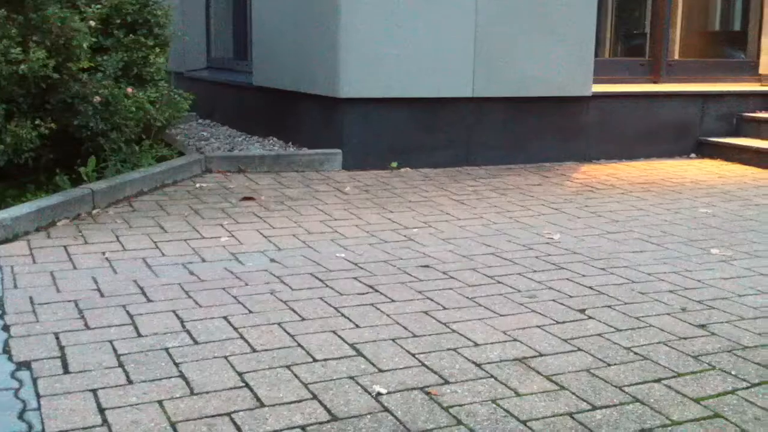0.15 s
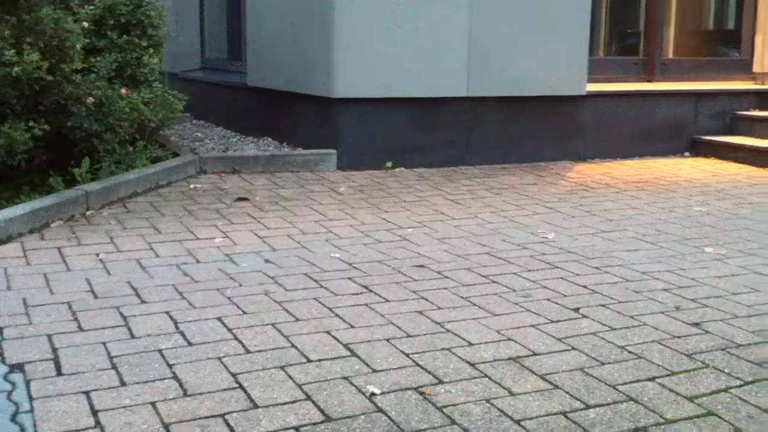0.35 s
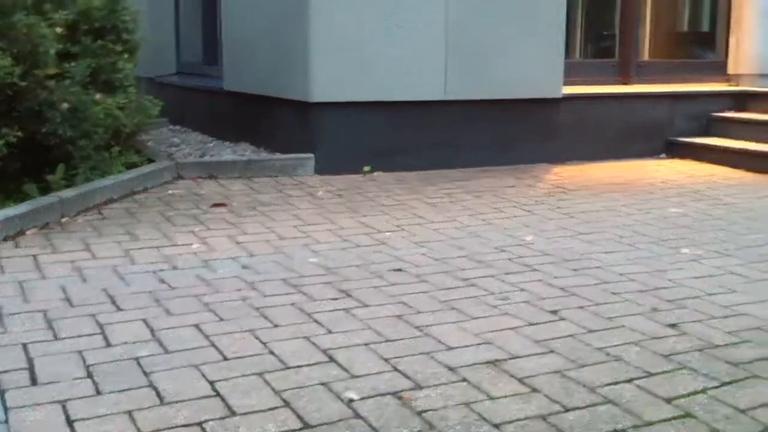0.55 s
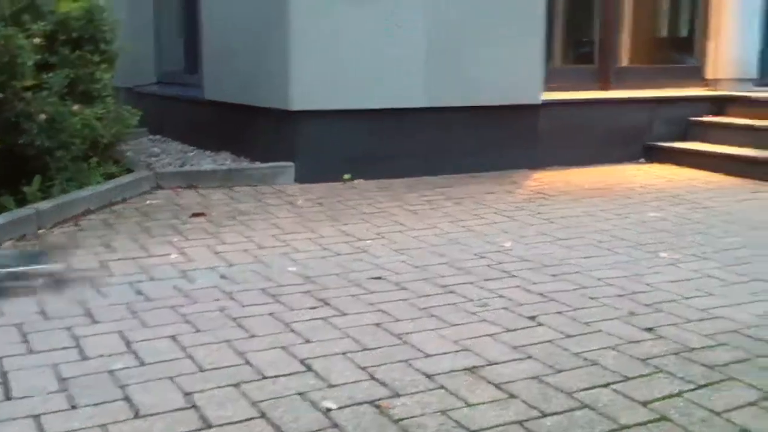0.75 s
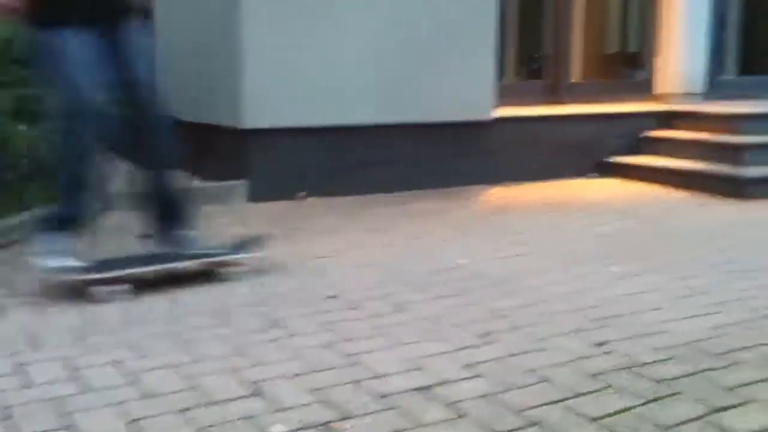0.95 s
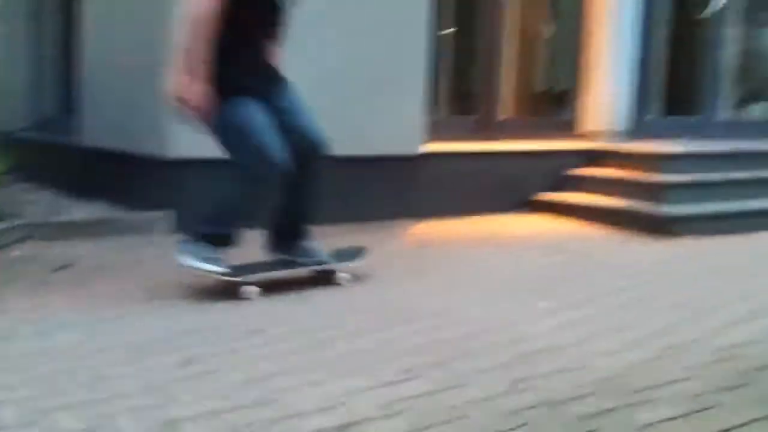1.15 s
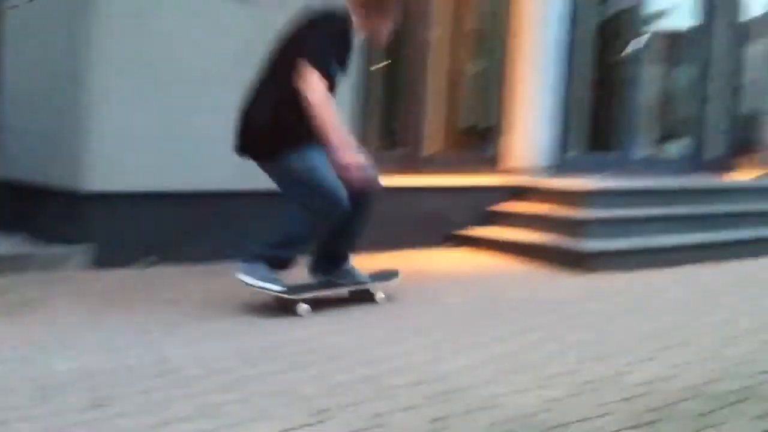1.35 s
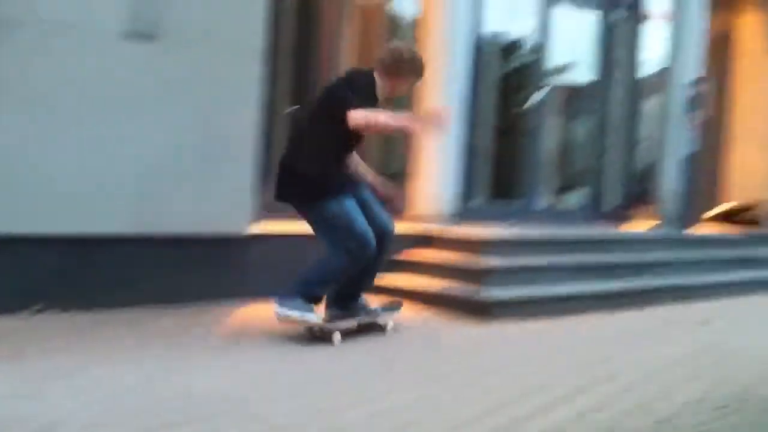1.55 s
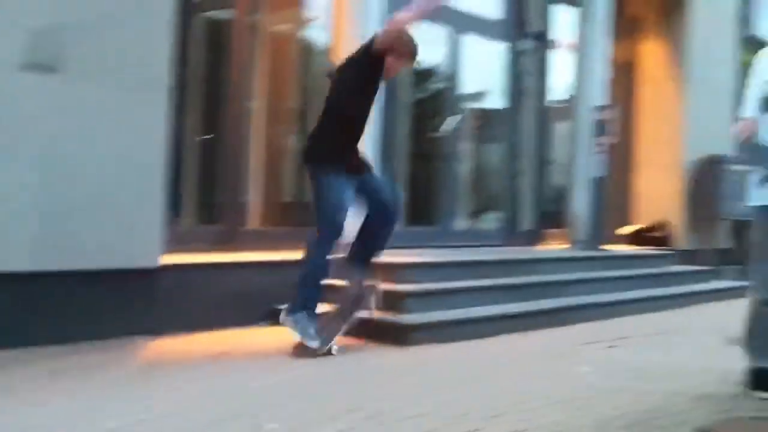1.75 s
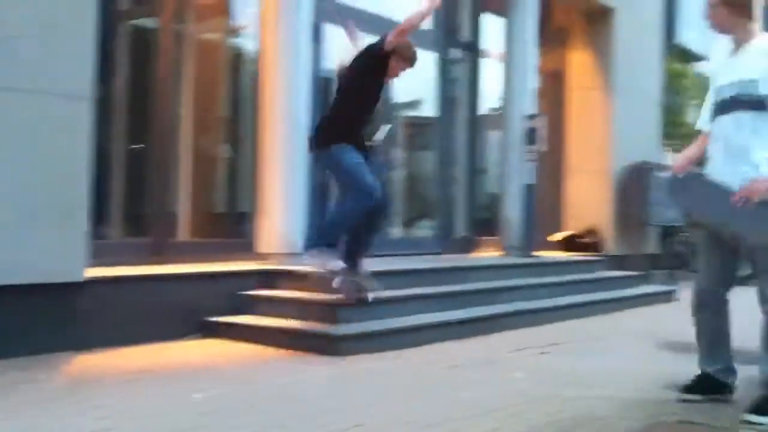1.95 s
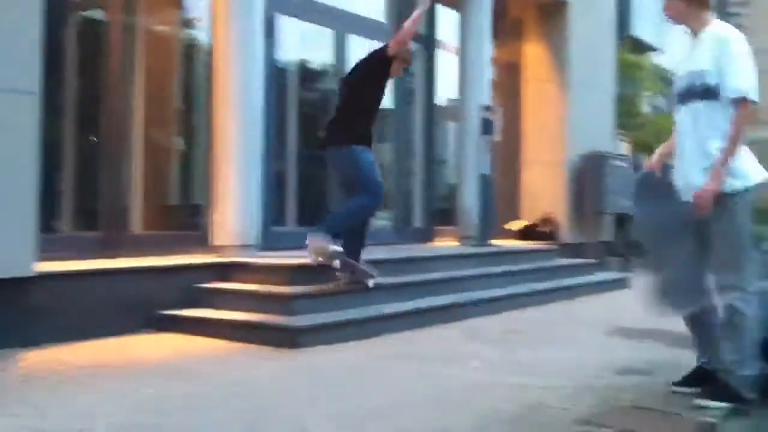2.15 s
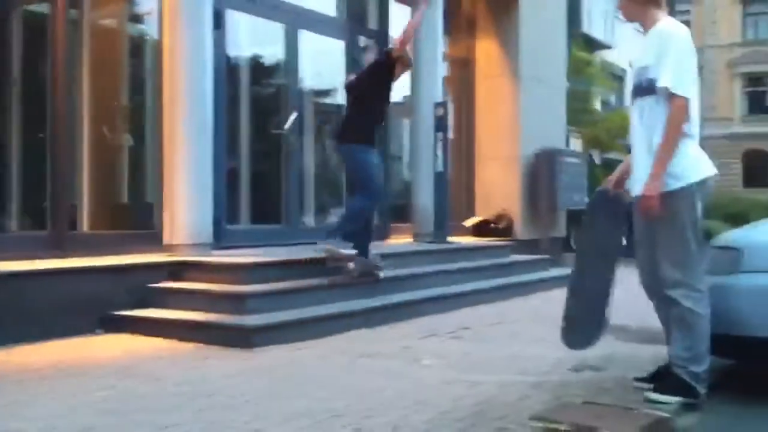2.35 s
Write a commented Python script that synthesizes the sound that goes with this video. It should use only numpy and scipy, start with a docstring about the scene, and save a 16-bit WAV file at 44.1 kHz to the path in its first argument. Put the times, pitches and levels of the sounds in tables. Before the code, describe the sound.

Skateboard wheels clatter across block paving, followed by a sharp tail snap and a heavy wooden landing

```python
"""A skateboard rattles over paving joints: each gives a thud, a clack and a fizz made of shaped, coloured grains.
It rolls on more smoothly on filtered grains, with a thin wheel ring; the deck's resonance mostly climbs in pitch.
Then the tail snaps: noisy blows plus a set of dying sine tones. Filtered noise makes the wheels whirr in the air.
The board lands hard on stone steps, made like the snap, and rolls on along the step on softer grains.
Steps and house front throw the knocks back as dull echoes; a short noise tail answers the whole ride."""
import sys
import numpy as np
from scipy import signal
from scipy.io import wavfile
from scipy.ndimage import uniform_filter1d

SR = 44100
rng = np.random.default_rng(int(sys.argv[2]) if len(sys.argv) > 2 else 0)


def transcribe(signal):
    """Save signal, clipped to [-1, 1], as a 16-bit WAV file at the path in sys.argv[1]."""
    frames = np.atleast_2d(signal).T
    limited = np.clip(frames, -1, 1)
    pcm = np.round(limited * 32767).astype(np.int16)
    wavfile.write(sys.argv[1], SR, pcm)


N = 105840  # length in samples: 2.4 s
TIME = np.arange(N) / SR


def amp(db):
    """Turns decibels into a gain."""
    return 10 ** (np.asarray(db) / 20)


def evened(x):
    """Scales a sound to an average (rms) strength of one."""
    return x / np.sqrt(np.mean(x ** 2) + 1e-20)


def curve(rows, axis=1):
    """Reads one column of a time table at every sample, in straight lines between rows."""
    rows = np.array(rows)
    return np.interp(TIME, rows[:, 0], rows[:, axis])


def level(rows, axis=1):
    """Gain from a dB column of a time table, silent before the first row."""
    return amp(curve(rows, axis=axis)) * (TIME > rows[0][0])


def read(points, hz):
    """Reads a spectrum table, in straight lines along a log-frequency axis."""
    table_hz, value = np.transpose(points)
    return np.interp(np.log(hz + 1), np.log(table_hz + 1), value)


def add(mix, start_s, sound):
    """Mixes a sound in at a start time, cut off at the end of the mix."""
    part = mix[max(round(start_s * SR), 0):][:len(sound)]
    part += sound[:len(part)]


def colour(x, points, size=4096):
    """Filters with the shape of a spectrum table; never rings ahead of the sound, total energy one."""
    hz = abs(np.fft.fftfreq(size, 1 / SR))
    log_gain = np.log(amp(read(points, hz)))
    # the Hilbert transform gives the phase that puts the energy as early as possible
    spectrum = np.exp(np.conj(signal.hilbert(log_gain)))
    taps = np.fft.ifft(spectrum).real[:size // 2]
    return signal.fftconvolve(x, taps / np.linalg.norm(taps))[:len(x)]


def resonate(x, hz, width_hz):
    """A resonance with a peak gain of one; its pitch may glide."""
    turn = np.exp(2j * np.pi * np.cumsum(hz * np.ones(len(x))) / SR)
    r = np.exp(-np.pi * width_hz / SR)
    # shift the pitch down to zero, smooth, then shift back up
    smooth = signal.lfilter([1 - r], [1, -r], x / turn + 1e-18)
    return 2 * (turn * smooth).real


def grains(size=N):
    """Dense tiny impacts of a wheel on rough stone: about 6000 random clicks a second."""
    force = amp(0.5 * np.minimum(rng.exponential(1, size), 3))
    return evened(force * rng.standard_normal(size) * (rng.random(size) < 6000 / SR))


# How fast the forecourt's tail dies. Each row: frequency in Hz, time to fall by 60 dB in seconds.
YARD_DECAY = [(150, 0.27), (600, 0.14), (2000, 0.13), (6000, 0.072), (16000, 0.065)]


def yard(x, gap_s=0.01, size=22050):
    """Short diffuse tail of the open forecourt: sparse random reflections, each pitch dying at its own rate."""
    taps = rng.standard_normal(size) * (rng.random(size) < .1) * (TIME[:size] > gap_s)
    hz, t, bands = signal.stft(taps, SR, nperseg=256)
    decay = amp(-60 * t / read(YARD_DECAY, hz)[:, None])
    tail = signal.istft(bands * decay, SR, nperseg=256)[1]
    return signal.fftconvolve(x, tail / np.linalg.norm(tail))[:N]


# Echoes from the ground, steps and house front. Each row: delay in seconds, level in dB.
REFLECTIONS = [(0.0202, -25.5), (0.0222, -26)]


def echoes(x, dull_hz=4000):
    """Distinct reflections from hard surfaces, with the treble softened."""
    out = np.zeros(N)
    dull = signal.lfilter(*signal.butter(1, dull_hz, fs=SR), x)
    for delay_s, db in REFLECTIONS:
        add(out, delay_s, amp(db) * dull)
    return out


# Wheels spinning freely. Each row: time in seconds, level in dB.
SPIN_LEVEL = [(1.83, -49), (1.9, -45), (2.0, -50), (2.09, -55), (2.15, -54)]
# Tone of that whirr. Each row: frequency in Hz, relative level in dB.
SPIN_TONE = [(40, -32), (130, 2), (240, 10), (400, -5), (560, 10), (850, -8), (1300, -10), (2200, 7),
             (3800, -3.5), (8000, -16), (16000, -20)]


def spinning_wheels():
    """Bearings whirr around the jump: steady noise through a fixed colour."""
    return level(SPIN_LEVEL) * colour(rng.standard_normal(N), SPIN_TONE)


# Rolling along the step after the landing. Each row: time in seconds, level in dB.
STEP_LEVEL = [(2.12, -40), (2.18, -41.5), (2.27, -42.5), (2.32, -39.5), (2.342, -32.5), (2.36, -38.5),
              (2.4, -35.5)]
# Tone of that roll. Each row: frequency in Hz, relative level in dB.
STEP_TONE = [(35, -84), (60, -38), (222, -15), (244, -5.5), (458, -12), (698, -3), (749, -9), (882, -2.5),
             (1110, -14.5), (1200, -10), (1700, -22), (2520, -18.5), (2840, -25), (5210, -30), (16000, -69)]


def step_roll():
    """The wheels run along the stone step: tiny impacts through a fixed colour."""
    return level(STEP_LEVEL) * colour(grains(), STEP_TONE)


# Thin ring of the wheels while they pass closest. Each row: time in seconds, level in dB.
WHEEL_LEVEL = [(.85, -48), (1.03, -39), (1.2, -44.5), (1.42, -55), (1.58, -66)]


def wheel_ring(hz=2180, width_hz=290):
    """Grit excites a narrow resonance of the wheels; filtering twice makes it narrower."""
    once = resonate(grains(), hz, width_hz)
    return level(WHEEL_LEVEL) * evened(resonate(once, hz, width_hz))


# Single bits of grit cracking under a wheel. Each row: start in seconds, level in dB.
GRIT_CRACKS = [(1.088, -25.5), (1.205, -29), (1.415, -30.5), (1.459, -30)]
# Tone of these cracks. Each row: frequency in Hz, relative level in dB.
GRIT_CRACK_TONE = [(300, -29), (900, 6), (2300, 2.5), (3500, -3.5), (7000, -8), (16000, -17)]


def ticks(fade_s=0.0025, size=1024):
    """Small dry cracks that stand out of the roll: noise bursts that die away fast."""
    out, t = np.zeros(N), np.arange(size) / SR
    for start_s, db in GRIT_CRACKS:
        add(out, start_s, amp(db) * rng.standard_normal(size) * np.exp(-t / fade_s))
    return colour(out, GRIT_CRACK_TONE)


def drone(rows, width_hz, steady_s=0.046):
    """The paving keeps one narrow, gliding resonance ringing at an even strength."""
    hz = curve(rows)
    ring = evened(resonate(resonate(grains(), hz, width_hz), hz, width_hz))
    power = uniform_filter1d(ring ** 2, int(steady_s * SR))
    return level(rows, axis=2) * ring / np.sqrt(abs(power) + 1e-6)


# Main bending resonance of the ridden deck. Each row: time in seconds, pitch in Hz, level in dB.
DECK_RING = [(.2, 490, -57), (.8, 520, -52), (1.35, 529, -40.5), (1.52, 553, -32), (1.62, 540, -34),
             (1.7, 559, -20.5), (1.75, 570, -39), (1.8, 588, -19.5), (1.86, 596, -63)]
# Two lower bands that drift as the board passes. Each row: time in seconds, pitch in Hz, level in dB.
LOW_RING = [(1.1, 296, -60), (1.2, 302, -37.5), (1.32, 216, -33), (1.43, 203, -40.5), (1.55, 244, -38.5),
            (1.8, 241, -33.5), (1.87, 242, -47), (2.1, 258, -67)]
MID_RING = [(.7, 383, -38.5), (.97, 356, -30.5), (1.1, 346, -39), (1.24, 394, -32.5), (1.45, 376, -42),
            (1.6, 385, -32.5), (1.8, 389, -39), (1.86, 388, -75)]


def deck_rings():
    """The shaken wooden deck sounds at its main resonance and in two lower bands."""
    return drone(DECK_RING, width_hz=70) + drone(LOW_RING, width_hz=42) + drone(MID_RING, width_hz=85)


# Strength of the roll. Each row: time in seconds, rumble in dB (before RUMBLE_DB), grit in dB, hiss in dB.
ROLL_LEVELS = [(.08, -53, -56, -65), (.17, -41.5, -53.5, -61), (.33, -38, -36.5, -43.5),
               (.75, -30, -32.5, -40.5), (.95, -31.5, -34.5, -43), (1.05, -36, -35.5, -42),
               (1.13, -35.5, -34.5, -41), (1.24, -33, -37, -45.5), (1.56, -30.5, -36, -45),
               (1.72, -30, -38, -48.5), (1.805, -32.5, -34, -46), (1.85, -45, -42.5, -50),
               (1.92, -44, -38, -69), (1.97, -54, -47.5, -62)]
# Tones of the three parts. Each row: frequency in Hz, relative level in dB.
RUMBLE_TONE = [(30, -54), (65, -44), (95, -29), (125, -8), (170, -1.5), (240, -1.5), (380, -5.5), (480, -1),
               (620, 2.5), (800, -1), (1200, -20), (2500, -35.5)]
GRIT_TONE = [(400, -33.5), (800, 0.5), (1100, 3), (1800, -1), (2200, -7), (2700, -16), (6000, -51)]
HISS_TONE = [(1500, -8), (2800, 7), (4500, 2), (7000, -1), (10000, -3), (13000, -8.5), (16000, -31)]
# A near reflection that lags as the board moves. Each row: time in seconds, lag in seconds.
REFLECTION_LAG = [(1.0, 0.0025), (1.2, 0.00283), (1.8, .0036)]
RUMBLE_DB, REFLECTION_DB = -1, -8.5  # further gain of the rumble; reflection against the direct shake
LUMP_DB, LUMP_S = 1.87, .008  # typical strength and length of the paving's unevenness


def rolling():
    """Uneven paving shakes the deck into a rumble and rings; grit crackles and hisses under the wheels."""
    bumps = uniform_filter1d(rng.standard_normal(N), int(LUMP_S * SR))
    lumps = amp(LUMP_DB * evened(bumps))
    shake = colour(grains() * lumps, RUMBLE_TONE)
    # the delayed copy strengthens some pitches and weakens others
    reflected = np.interp(TIME - curve(REFLECTION_LAG), TIME, shake)
    rumble = evened(shake + amp(REFLECTION_DB) * reflected)
    rings = deck_rings()
    crunch = evened(grains() * lumps)
    grit = colour(crunch, GRIT_TONE)
    hiss = colour(evened(crunch + 0.51 * rng.standard_normal(N)), HISS_TONE)
    return (rings + amp(RUMBLE_DB) * level(ROLL_LEVELS, axis=1) * rumble
            + level(ROLL_LEVELS, axis=2) * grit + level(ROLL_LEVELS, axis=3) * hiss)


# Wheels crossing paving joints. Each row: time in seconds (before LAG_S), thud in dB, clack in dB,
# fizz in dB (before FIZZ_DB), spread of the wheels' strikes in seconds.
CROSSINGS = [(0.1119, -44.5, -48.0, -54.5, 0.0066), (0.1356, -40.5, -43.5, -49.5, 0.0064),
             (0.1627, -34.0, -36.5, -44.5, 0.0079), (0.1952, -32.5, -31.0, -43.0, 0.0094),
             (0.2209, -31.0, -29.5, -42.0, 0.0059), (0.2484, -29.5, -28.5, -36.5, 0.0072),
             (0.2723, -28.0, -25.5, -35.0, 0.0063), (0.2971, -23.0, -22.5, -31.5, 0.0085),
             (0.3211, -21.5, -23.0, -31.0, 0.0082), (0.3447, -18.5, -19.5, -27.5, 0.0058),
             (0.3681, -20.0, -22.5, -30.5, 0.0069), (0.3934, -23.0, -19.5, -31.0, 0.0072),
             (0.4168, -22.0, -20.5, -29.5, 0.0097), (0.4419, -23.5, -20.0, -30.5, 0.0073),
             (0.4688, -24.5, -21.0, -32.5, 0.006), (0.4936, -25.5, -21.5, -29.5, 0.0074),
             (0.5184, -22.0, -22.5, -30.0, 0.0092), (0.5443, -22.5, -22.0, -31.0, 0.0055),
             (0.5737, -23.0, -21.0, -29.5, 0.0058), (0.5988, -18.0, -19.0, -29.5, 0.0064),
             (0.6264, -24.0, -21.0, -32.5, 0.0055), (0.6523, -24.0, -22.0, -32.5, 0.0052),
             (0.6795, -22.5, -22.5, -31.0, 0.0074), (0.7039, -22.5, -26.0, -34.0, 0.0062),
             (0.7322, -21.5, -26.0, -35.5, 0.009), (0.7583, -23.0, -20.0, -31.0, 0.0097),
             (0.7848, -22.5, -21.0, -32.0, 0.0067), (0.8134, -25.0, -27.5, -34.5, 0.0066),
             (0.8389, -26.5, -24.5, -37.0, 0.0057), (0.8683, -25.5, -22.5, -33.0, 0.0037),
             (0.8945, -30.5, -31.5, -42.5, 0.0074), (0.9225, -30.5, -32.0, -38.0, 0.0064),
             (0.9478, -29.5, -34.0, -42.0, 0.005), (0.9628, -28.5, -35.5, -44.0, 0.0105),
             (0.9912, -30.0, -34.0, -45.0, 0.0105), (1.0226, -31.0, -33.5, -41.5, 0.0097),
             (1.0429, -35.0, -34.0, -42.5, 0.0066)]
# Tones of the three parts. Each row: frequency in Hz, relative level in dB (before the random tint).
THUD_TONE = [(30, -28), (95, -23.5), (130, -16.5), (170, -0.5), (290, -6), (400, -1.5), (500, 7),
             (600, 4.5), (680, -11), (770, -4.5), (1000, -31.5), (2500, -42)]
CLACK_TONE = [(300, -38), (640, -3), (770, 5), (950, 3.5), (1130, 3), (1270, 7), (1600, 0), (1850, 1),
              (2200, -5), (3000, -13), (4000, -23.5), (16000, -30)]
FIZZ_TONE = [(1500, -21), (2700, 10), (3800, 7.5), (5000, 5), (8000, 0.5), (12000, -4), (16000, -11)]
FIZZ_DB, TINT_DB = -1, 2.5  # further gain of the fizz; random colour change of every joint
LAG_S, LEAD_S, END_S = .0006, .016, .018  # shift of all joints, room before each, time of the cut-off
EARLY, RISE, HOLD = .39, .3, .75  # head start, swell and hold of a burst, in multiples of the spread
THUD_FALL, CLACK_FALL, FIZZ_FALL = .9, .7, .9  # fade of each part, in multiples of the spread


def joints(burst_s=0.017, size=4096):
    """Wheels crunch over each edge: a thud of the deck, a clack and a fizz of grit, cut short as they clear it."""
    out, t = np.zeros(N), np.arange(size) / SR - LEAD_S
    cut = np.exp(-(t / END_S) ** 4)
    for joint_s, thud_db, clack_db, fizz_db, spread_s in CROSSINGS:
        u = t / spread_s + EARLY
        parts = [(THUD_TONE, thud_db, THUD_FALL),
                 (CLACK_TONE, clack_db, CLACK_FALL),
                 (FIZZ_TONE, fizz_db + FIZZ_DB, FIZZ_FALL)]
        for points, db, fall in parts:
            rise = np.exp(-(u / RISE) ** 2 / 2)
            fade = np.exp(-np.maximum(u - HOLD, 0) / fall)
            swell = np.where(u < 0, rise, fade)
            tinted = [(hz, band_db + TINT_DB * rng.standard_normal()) for hz, band_db in points]
            part = evened(colour(swell * cut * grains(size=size), tinted))
            # the level counts as if all the energy fell within burst_s
            add(out, joint_s + LAG_S - LEAD_S, amp(db) * np.sqrt(burst_s * SR / size) * part)
    return out


RATTLE_S, RATTLE_PER_S = .032, 1400  # trucks and bolts clatter after each blow, then settle


def knock(blows, modes, crack, ring_db, crack_db, build_cycles, splinter, rattle_db, wet_db, ring_wet_db,
          crack_s=.0016, size=16384):
    """Quick blows of wood on stone crack and clatter; the hardest sets the modes ringing, the yard answers."""
    t, ring, drive = np.arange(size) / SR, np.zeros(N), np.zeros(N)
    for start_s, db in blows:
        clicks = evened(rng.standard_normal(size) * (rng.random(size) < RATTLE_PER_S / SR))
        clatter = clicks * np.exp(-(t / RATTLE_S) ** 2)
        noise = rng.standard_normal(size) * np.exp(-t / crack_s)
        burst = splinter * evened(noise + amp(rattle_db) * clatter) / np.sqrt(size)
        burst[0] += 1  # the sharp first contact
        add(drive, start_s, amp(db + crack_db) * burst / np.linalg.norm(burst))
    tone = np.zeros(size)
    for hz, db, t60 in modes:
        build = (1 - np.exp(-hz * t / build_cycles)) ** 2
        tone += amp(db - 60 * t / t60) * np.sin(2 * np.pi * (hz * t + rng.random())) * build
    hardest_s = max(blows, key=lambda blow: blow[1])[0]
    add(ring, hardest_s, amp(ring_db) * tone)
    snap = colour(drive, crack)
    return ring + snap + echoes(snap) + yard(amp(wet_db) * snap + amp(ring_wet_db) * ring)


# Blows of the tail. Each row: start in seconds, level in dB (before crack_db).
TAIL_BLOWS = [(1.9238, -20), (1.9256, -0.5), (1.9302, -3)]
# Ringing tones of the board. Each row: pitch in Hz, level in dB (before ring_db), time to fall 60 dB in seconds.
TAIL_MODES = [(545, -5.5, 0.081), (760, 1.5, 0.051), (1324, 3, 0.062), (1410, -11.5, 0.17),
              (2070, -7.5, 0.16), (2370, -11, 0.15), (3110, -13, 0.049), (3340, -3, 0.057),
              (4120, -15, 0.062), (5300, -12, 0.078)]
# Tone of the crack. Each row: frequency in Hz, relative level in dB.
TAIL_CRACK = [(40, -26), (130, -17), (250, -0.5), (550, -5), (1300, 5.5), (2500, 0.5), (3500, -2),
              (4400, -6.5), (5200, -10.5), (6500, -22.5), (11000, -28), (16000, -40)]


def tail_snap():
    """The tail snaps: a bright crack whose ring builds up almost at once."""
    return knock(TAIL_BLOWS, TAIL_MODES, TAIL_CRACK, ring_db=-21, crack_db=10.5,
                 build_cycles=0.38, splinter=2.1, rattle_db=-15, wet_db=-19.5, ring_wet_db=-12)


# Blows of the landing. Each row: start in seconds, level in dB (before crack_db).
LANDING_BLOWS = [(2.1075, -25), (2.1117, -8), (2.1133, 4), (2.1172, -5), (2.1208, -1.5)]
# Ringing tones of the board. Each row: pitch in Hz, level in dB (before ring_db), time to fall 60 dB in seconds.
LANDING_MODES = [(255, -7, .11), (599, 8, .06), (757, -5, .055), (1000, -8, .07), (1245, -7, .07),
                 (1405, -12, .08), (1830, -18, .07), (2220, -14, .06), (2702, -7, .055), (3290, -22, .06)]
# Tone of the crack. Each row: frequency in Hz, relative level in dB.
LANDING_CRACK = [(40, -27), (150, 2.5), (230, -4), (330, 1.5), (420, -0.5), (620, 2.5), (900, 9.5),
                 (1130, -3), (1400, 6), (2000, -3.5), (2800, -3), (3400, -13), (5500, -11.5), (7000, -22),
                 (11000, -25.5), (16000, -34)]


def landing():
    """The board hits the stone step: a lower crack with a stronger ring that takes longer to build."""
    return knock(LANDING_BLOWS, LANDING_MODES, LANDING_CRACK, ring_db=-6.5, crack_db=11,
                 build_cycles=1.5, splinter=2.3, rattle_db=-20, wet_db=-16.5, ring_wet_db=-18)


def scene(ride_wet_db=-17):
    """The ride, the pop and the landing in the forecourt."""
    ride = joints() + ticks() + rolling() + wheel_ring() + spinning_wheels() + step_roll()
    knocks = tail_snap() + landing()
    return (ride + amp(ride_wet_db) * yard(ride) + knocks)[None]


def record(dry, overload=.97, edge_hz=16200):
    """Rounds off the loudest peaks, then removes what lies above the band edge."""
    held = dry / (1 + (dry / overload) ** 6) ** (1 / 6)
    low_pass = signal.firwin(511, edge_hz, window=("kaiser", 9), fs=SR)
    return signal.oaconvolve(held, low_pass[None], "same")


dry = scene()
out = record(dry)
transcribe(out)
```